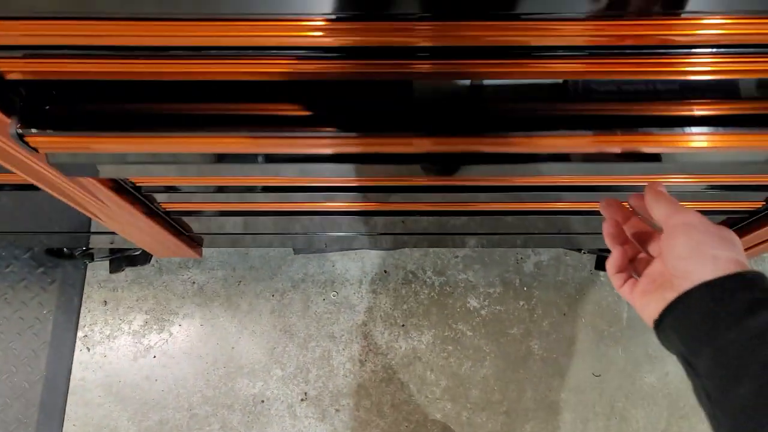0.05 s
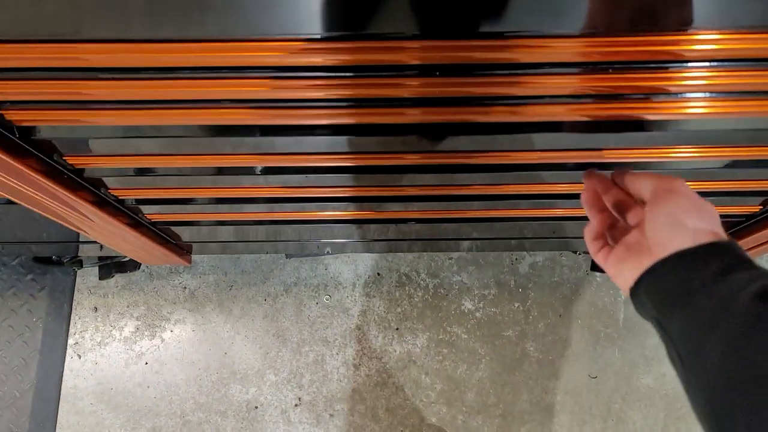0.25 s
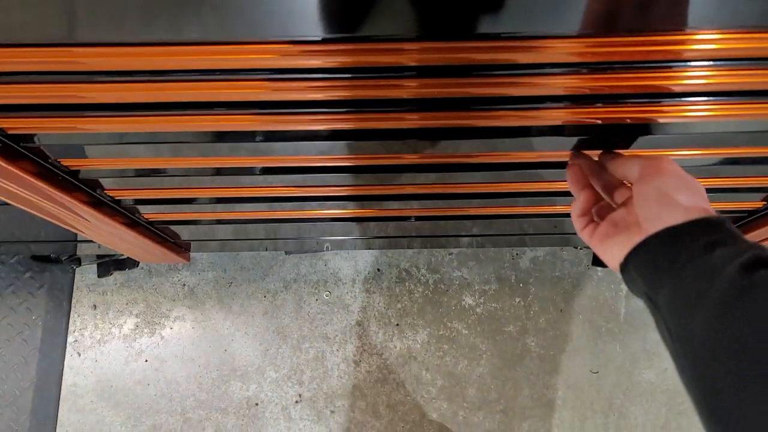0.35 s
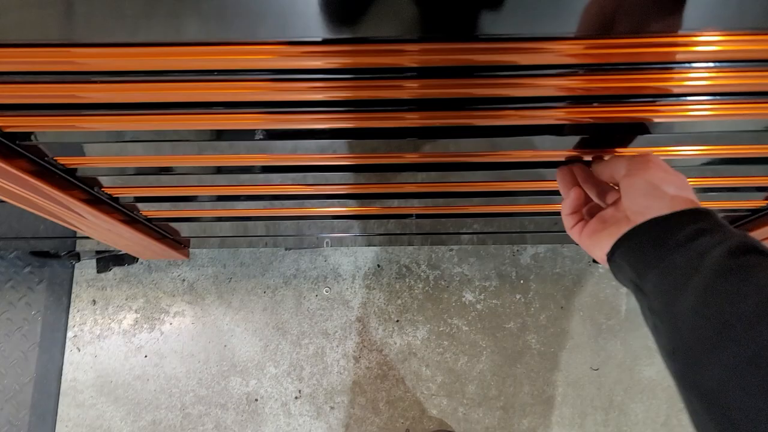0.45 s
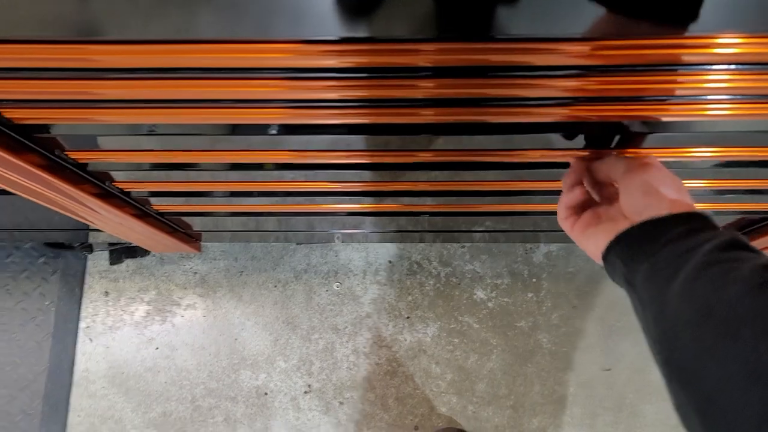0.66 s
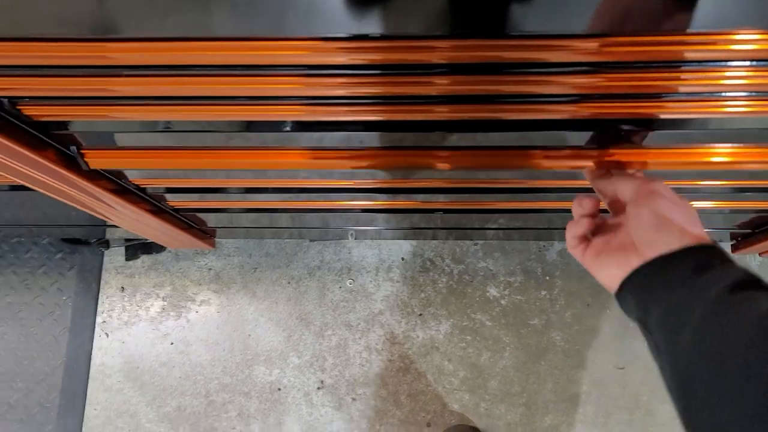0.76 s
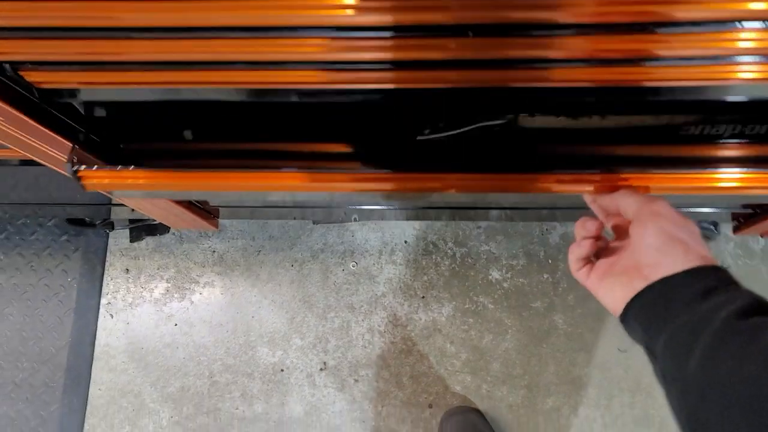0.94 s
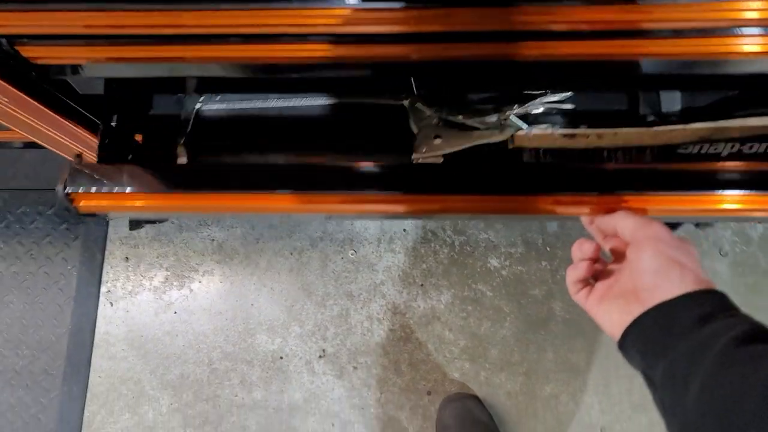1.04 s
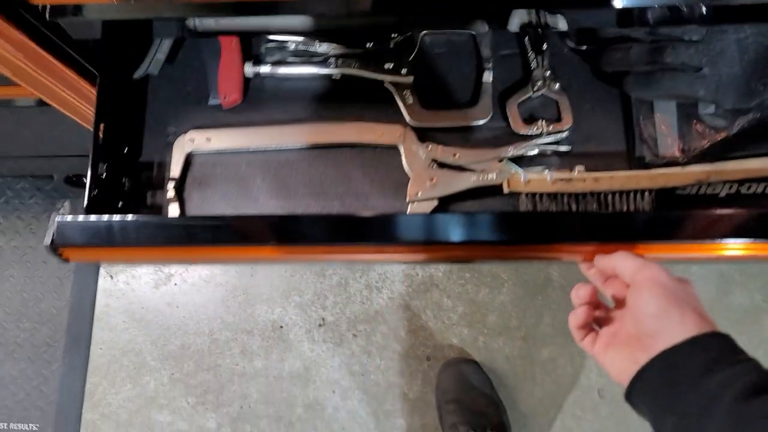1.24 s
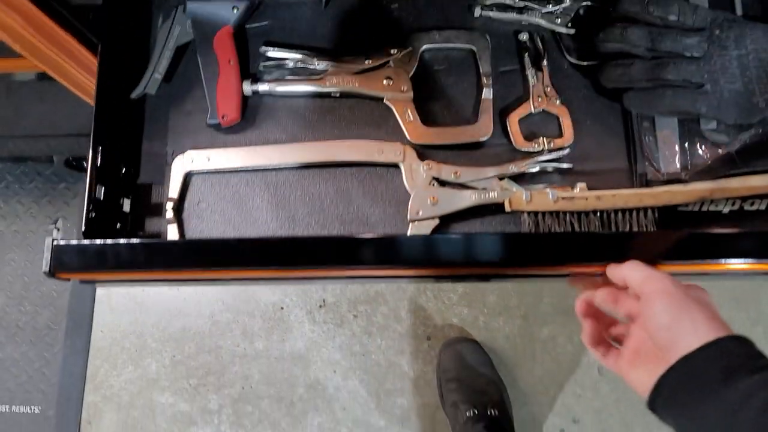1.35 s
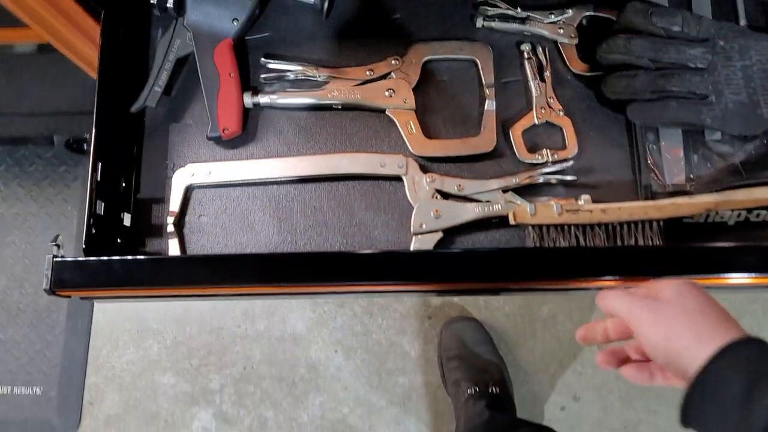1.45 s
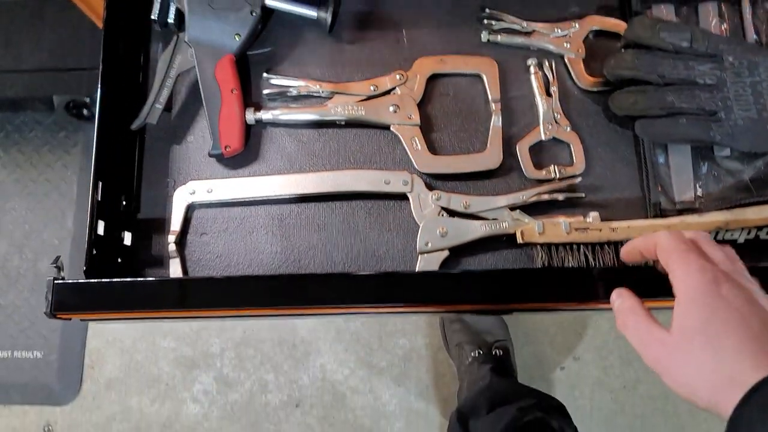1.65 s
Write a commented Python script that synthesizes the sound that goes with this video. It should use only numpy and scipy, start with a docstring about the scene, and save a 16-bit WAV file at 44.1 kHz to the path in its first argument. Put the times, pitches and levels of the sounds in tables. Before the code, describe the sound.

Close up in an echoing garage, a metal drawer bangs closed, rattling its tools and shaking the cabinet. Bright clacks follow as another drawer unlatches, slides out quietly and hits its stop, over a faint room hum.

```python
"""A steel tool box drawer slams shut, close to a stereo microphone in a reverberant garage.
Slides and tools clatter, ringing the sheet steel, and the cabinet's big panels boom.
A second drawer is pulled off its catch, rolls out on ball-bearing slides and clacks against its
end stop; a rail squeaks faintly. Behind the box are the concrete room's tail, hum and hiss."""
import sys
import numpy as np
from scipy import signal
from scipy.fft import rfft, irfft
from scipy.io import wavfile

SR = 44100
rng = np.random.default_rng(int(sys.argv[2]) if len(sys.argv) > 2 else 0)


def pcm_store(signal):
    """Save signal as 16-bit PCM."""
    levels = np.round(np.clip(np.atleast_2d(signal), -1, 1) * 32767)
    wavfile.write(sys.argv[1], SR, levels.astype(np.int16).T)


N = 74970
LEFT_RIGHT = np.array([[1], [-1]])

# blows as the first drawer shuts
# (time [s], level [dB], bass [dB], treble [dB], ring t60 [s], left over right [dB])
SLAM_BLOWS = [(0.181, -13.5, 14, -11, 0.075, 4), (0.192, -21.5, 14.5, -12, 0.11, 12),
              (0.204, -22, 14, -21.5, 0.13, 3.5), (0.217, -23, 1.5, -8.5, 0.15, 6),
              (0.2235, -1, 0, -6.5, .08, -1.5), (0.228, 1, -3.5, -8, 0.21, 3),
              (0.257, 4, 1.5, -4.5, 0.049, 4), (0.268, 2.5, -9.5, -1, 0.13, 5.5),
              (0.277, -2.5, 4.5, 5, 0.06, 2), (0.285, -2.5, 6.5, -5, 0.078, 4),
              (0.309, -6.5, 10.5, -2.5, .12, 5.5), (0.362, -6.5, 7, -8.5, 0.073, 6.5),
              (0.376, -7.5, 4, -23, 0.032, 1)]
# dense ringing of its sheet steel (frequency [Hz], level [dB])
SLAM_COLOUR = [(60, -9), (120, -12.5), (230, -4.5), (320, -11.5), (430, -3.5), (600, -11.5), (1100, -1),
               (1700, -1), (2750, -3), (5400, -6.5), (8600, -17.5), (13500, -8), (16000, -14)]
# its strongest modes (frequency [Hz], level [dB], t60 [s])
FIRST_DRAWER_MODES = [(242, -17, 0.22), (395, -7, 0.43), (429.5, 0, 0.15), (706, -6, 0.28),
                      (1096, 1.5, 0.11), (1144, -4, 0.16), (1322, 0.5, .18), (1470, 0.5, 0.24),
                      (1520, -5.5, 0.062), (1626, -8, 0.13), (1680, -23, .17), (1775, -0.5, 0.19),
                      (2420, -12.5, 0.26), (2460, -25.5, .15)]


def slam():
    """Close to the microphone, the first drawer hits home and its slides and tools clatter."""
    return clatter(SLAM_BLOWS, SLAM_COLOUR, FIRST_DRAWER_MODES, sheet_db=0, modes_db=-26)


# clacks of the catch (time [s], level [dB], bass [dB], treble [dB], ring t60 [s], left over right [dB])
CATCH_BLOWS = [(0.688, -27.5, -28, 7, 0.06, 5), (0.694, -6, -16, 8, 0.05, 4.2),
               (0.7065, -4.5, 0.5, 7, 0.052, 4), (0.718, -20, 4.5, -5.5, 0.17, 8.7),
               (0.729, -23, 7.5, 1.5, .15, 4.9), (0.7505, -13.5, 3.5, -10.5, 0.12, 9),
               (0.7545, -9, 6.5, 12, 0.045, 6.1), (0.766, -16, 3, -12.5, .11, 2.4),
               (0.781, -22.5, 2, -49, .06, 6.1)]
# dense ringing of the steel around it (frequency [Hz], level [dB])
CATCH_COLOUR = [(60, -7), (130, -6), (230, -9), (360, -3.5), (570, -11), (800, -10.5), (1200, 3.5),
                (1800, 0.5), (2900, -1), (3800, -6.5), (6500, -10), (9400, -27.5), (13500, -13),
                (16000, -31.5)]
# its strongest modes (frequency [Hz], level [dB], t60 [s])
CATCH_MODES = [(154.4, -8, 0.12), (247, -15, 0.12), (362, -10, 0.17), (789, -5, 0.18), (1063, 2.5, 0.08),
               (1138, 1.5, 0.18), (1248, -3, 0.14), (1389, 4, .11), (2060, -7, 0.087), (2320, -29, 0.08),
               (2683, 3.5, 0.081), (2980, -4, 0.022), (2980, 7, 0.054), (3620, -10, 0.041)]


def catch():
    """The second drawer's catch lets go with a run of bright clacks."""
    return clatter(CATCH_BLOWS, CATCH_COLOUR, CATCH_MODES, sheet_db=-1.44, modes_db=-21.5)


# knocks of the slides and the end stop
# (time [s], level [dB], bass [dB], treble [dB], ring t60 [s], left over right [dB])
STOP_BLOWS = [(1.247, -34, 2, -6.5, 0.037, 2.5), (1.281, -30, 6, -15, 0.028, 3.2),
              (1.316, -23.5, -2, -16.5, 0.045, 8.7), (1.381, -3.5, 4, -12, 0.11, 6.9),
              (1.398, -3.5, 2, -18.5, 0.12, 11), (1.4275, 3.5, 0, -10.5, 0.12, 5.5),
              (1.445, -9, 4, -14.5, 0.06, 1.7), (1.683, -25, 0, -18, .1, 2.7)]
# dense ringing of the second drawer's sheet steel (frequency [Hz], level [dB])
STOP_COLOUR = [(60, -55), (130, -16.5), (250, -14.5), (420, -15), (580, -20.5), (760, -12), (1400, -8.5),
               (1950, -7), (2630, -9.5), (5300, -10), (7500, -19), (14000, -10.5), (16000, -17)]
# its strongest modes (frequency [Hz], level [dB], t60 [s])
SECOND_DRAWER_MODES = [(209.3, -15.5, 0.2), (399.4, -9, 0.17), (442.7, -4.5, 0.15), (741, -8.5, 0.16),
                       (1040, -10, 0.11), (1112, -10, 0.1), (1236, 0, 0.087), (1467, 2.5, 0.11),
                       (1670, -3, 0.12), (2204, -6, .1), (2560, -7, 0.086), (2700, -4, .09),
                       (2780, -5.5, 0.23), (2905, -3.5, 0.095)]


def end_stop():
    """The second drawer knocks along its slides and hits the stop, left of the microphone."""
    return clatter(STOP_BLOWS, STOP_COLOUR, SECOND_DRAWER_MODES, sheet_db=-0.37, modes_db=-21)


def clatter(blows, colour, modes, sheet_db, modes_db, size=16384):
    """Steel on steel rings dense sheet modes and a few strong ones. Gives (near sound, room feed)."""
    attack_s, force_spread_db, detune = 0.0029, 2, .002
    dense, strong, t = np.zeros((2, N)), np.zeros((2, N)), np.arange(size) / SR
    for start, db, bass_db, treble_db, t60, pan_db in blows:
        sheet = tint(stereo_noise(size, likeness=0.18, from_box=True), colour)
        sheet = tint(sheet, [(300, bass_db), (1200, 0), (3000, 0.017), (11000, treble_db)])
        pan = [(300, 0.53), (600, pan_db), (2400, pan_db), (4500, pan_db - 5)]
        sheet = irfft(rfft(sheet) * undb(LEFT_RIGHT * along(pan, freqs(size)) / 2), size)
        sheet = die_away(sheet, [(250, t60 * 1.61), (1500, t60), (10000, t60 * 0.97)])
        ring = 0
        # each mode varies a little in strength and pitch from blow to blow
        for (hz, mode_db, mode_t60), (force, shift) in zip(modes, rng.standard_normal((len(modes), 2))):
            cycles = hz * (1 + detune * shift) * t + rng.random()
            phase = 2 * np.pi * cycles + LEFT_RIGHT * left_lead(hz) / 2
            gain = undb(mode_db + force_spread_db * force + LEFT_RIGHT * along(pan, hz) / 2)
            ring = ring + gain * fade(t, mode_t60) * np.sin(phase)
        push = undb(db) * np.minimum(t / attack_s, 1)
        add(dense, undb(sheet_db) * sheet * push, start)
        add(strong, undb(modes_db) * ring * push, start)
    # the strong modes stay close to the box and reach the room less
    return np.array([dense + strong, dense + undb(-11.5) * strong])


# booms and hollow knocks of the cabinet's panels (time [s], frequency [Hz], level [dB], rise [s])
PANEL_BOOMS = [(0.281, 70.8, -5.5, 0.03), (0.357, 74.8, -12.5, 0.036), (0.598, 54.6, -28.5, 0.041),
               (0.703, 212, -36, 0.0033), (0.716, 224.4, -24, 0.009), (0.754, 87.4, -29, 0.035),
               (1.093, 57.4, -37.5, 0.033)]
# low standing waves set off by the slam (frequency [Hz], level [dB], t60 [s])
STANDING_WAVES = [(54, -8, 0.63), (67.4, -24, 0.91), (77.9, -29, 1), (89.9, -15, 0.79),
                  (121.5, -29.5, 0.91), (143.2, -21, 0.56), (196.2, -38.5, 1), (234, -31.5, 0.91)]


def cabinet():
    """Big panels heave at the slam, on the rebound and as the next drawer moves; low waves linger."""
    build_s, right_lag_s = 0.066, 0.0005
    out, t = np.zeros((2, N)), np.arange(N) / SR
    for start, hz, db, rise in PANEL_BOOMS:
        add(out, swell(hz, db, rise), start)
    waves = sum(undb(db) * np.sin(2 * np.pi * hz * t) * fade(t, t60) for hz, db, t60 in STANDING_WAVES)
    add(out, waves * (1 - np.exp(-t / build_s)), start=0.33)
    return np.array([out[0], np.interp(t - right_lag_s, t, out[1])])


# rolling of the slides at the microphone (time [s], level [dB])
ROLL_LEVEL = [(0, -54.5), (.17, -56), (.26, -37.5), (.88, -78), (.98, -54), (1.12, -51), (1.25, -46),
              (1.37, -40), (1.46, -52), (1.6, -45.5), (1.7, -46)]
# drone of the rolling drawer (frequency [Hz], level [dB])
ROLL_COLOUR = [(60, -23), (150, -17), (270, -11.5), (370, -2), (435, 0.5), (560, -9.5), (900, -14),
               (1400, -23.5), (2200, -27.5), (5000, -29), (8000, -40), (13000, -37.5), (16000, -40)]


def slides(ticks_per_s=560, tick_spread_db=4.5, flutter_db=0.5):
    """Bearing balls tick densely along their rails and make the drawer's floor drone."""
    t = np.arange(N) / SR
    ticks = (rng.random(N) < ticks_per_s / SR) * undb(tick_spread_db * rng.standard_normal(N))
    tick_sound = stereo_noise(256, likeness=.3) * np.hanning(256)
    contact = signal.fftconvolve(ticks[None], tick_sound, axes=1)[:, :N]
    drone = unit(tint(unit(contact) + stereo_noise(N, likeness=0.15), ROLL_COLOUR))
    flutter = np.interp(t, np.linspace(0, N / SR, 50), rng.standard_normal(50))
    level_db = np.interp(t, *np.array(ROLL_LEVEL).T)
    return drone * undb(level_db + flutter_db * flutter)


def rail_squeak():
    """A rail rubs briefly near full extension: one faint, unsteady tone."""
    out = np.zeros((2, N))
    waver = unit(tint(rng.standard_normal(N), [(60, 7), (400, -57)]))
    add(out, swell(hz=955, db=-42, rise_s=.02) * (1 + .5 * waver), start=1.670)
    return out


# reverberation of the garage around the microphone (frequency [Hz], level [dB])
ROOM_COLOUR = [(60, -4.5), (190, -3.5), (310, -4), (440, -8), (650, -3.5), (1000, -15), (1500, -13.5),
               (2700, -12), (5500, -13.5), (8000, -14.5), (14000, -21)]
# its decay (frequency [Hz], t60 [s])
ROOM_T60 = [(60, 0.84), (250, 0.94), (1000, 0.84), (2500, 1.076), (5500, 1.056), (9000, 0.53), (15000, .45)]


def garage(x, delay_s=0.0066, build_s=0.012):
    """Farther off, concrete floor and walls return a diffuse tail; the high treble dies first."""
    t = np.arange(N) / SR
    build = 1 - np.exp(-np.maximum(t - delay_s, 0) / build_s)
    tail = die_away(tint(stereo_noise(N), ROOM_COLOUR), ROOM_T60) * build / np.sqrt(SR / 10)
    return signal.fftconvolve(x, tail, axes=1)[:, :N]


# background of the garage (frequency [Hz], level [dB])
ROOM_TONE_COLOUR = [(20, -18.5), (45, -9), (68, 5.5), (110, -11), (250, -17), (600, -37.5), (1500, -29),
                    (3500, -36.5), (6000, -45), (9000, -61.5), (16000, -62.5)]


def room_tone(db=-48):
    """Steady hum and hiss all around the microphone."""
    return undb(db) * unit(tint(stereo_noise(N), ROOM_TONE_COLOUR))


# the box as it reaches the microphone pair (frequency [Hz], left phase lead [rad])
BOX_PHASE = [(450, -2), (800, -1.88), (1200, -2), (1800, -2.5), (2700, -2.5), (4000, -0.5), (6000, -1),
             (12000, 2)]


def left_lead(hz):
    """Phase lead of the left channel, tapered below 600 Hz: long waves reach both sides alike."""
    return along(BOX_PHASE, hz) * np.minimum(hz / 600, 1) ** 3


def stereo_noise(size, likeness=0., from_box=False):
    """Noise with shared bass and the rest partly alike (0-1); sound from the box is shifted in phase."""
    hz = freqs(size)
    alike = np.clip(likeness + (1 - likeness) * .98 / (1 + (hz / 420) ** 4), 0, 1)
    mid, side = rfft(rng.standard_normal((2, size)))
    pair = (mid * np.sqrt(1 + alike) + LEFT_RIGHT * side * np.sqrt(1 - alike)) / np.sqrt(2)
    if from_box:
        pair = pair * np.exp(1j * LEFT_RIGHT * left_lead(hz) / 2)
    return irfft(pair, size)


def die_away(x, t60s, octaves=10, lowest_hz=31.25):
    """Let each octave decay at its own rate, given as (frequency [Hz], t60 [s])."""
    size = x.shape[-1]
    t, spectrum = np.arange(size) / SR, rfft(x)
    octave = np.clip(np.log2(np.maximum(freqs(size), 1) / lowest_hz), 0, octaves - 1)
    out = 0
    for k in range(octaves):
        band = irfft(spectrum * np.maximum(1 - abs(octave - k), 0), size)
        out = out + band * fade(t, along(t60s, lowest_hz * 2 ** k))
    return out


def swell(hz, db, rise_s):
    """A tone that grows to its peak and dies again."""
    t = np.arange(N) / SR
    growth = (t / rise_s) ** 2
    return undb(db) * growth * np.exp(1 - growth) * np.cos(2 * np.pi * hz * t)


def tint(x, colour):
    """Filter a sound by a curve of (frequency [Hz], level [dB])."""
    size = x.shape[-1]
    return irfft(rfft(x) * undb(along(colour, freqs(size))), size)


def along(points, hz):
    """Read (frequency [Hz], value) points on a logarithmic frequency axis."""
    points_hz, values = np.array(points, float).T
    return np.interp(np.log(np.maximum(hz, 1)), np.log(points_hz), values)


def freqs(size):
    """Frequencies of the spectrum of a sound of this length."""
    return np.arange(size // 2 + 1) * SR / size


def undb(db):
    """Decibels to gain."""
    return 10 ** (np.asarray(db) / 20)


def unit(x):
    """Scale to rms 1."""
    return x / np.sqrt(np.mean(x ** 2))


def fade(t, t60):
    """Exponential decay, 60 dB in t60 seconds."""
    return np.exp(-np.log(1000) * t / np.maximum(t60, 1e-3))


def add(out, x, start):
    """Mix a sound in at a start time in seconds."""
    i = int(start * SR)
    size = min(x.shape[-1], N - i)
    out[:, i:i + size] += x[..., :size]


def scene():
    """Close up, one drawer shuts and the next rolls out to its stop; the garage answers."""
    near, room_feed = slam() + catch() + end_stop()
    return near + garage(room_feed) + cabinet() + slides() + rail_squeak() + room_tone()


def record(dry):
    """The recorder clips at full scale and cuts the treble above 16 kHz."""
    lowpass = signal.ellip(10, .2, 70, 16000, fs=SR, output="sos")
    return signal.sosfilt(lowpass, np.clip(dry, -1, 1))


dry = scene()
out = record(dry)
pcm_store(out)
```